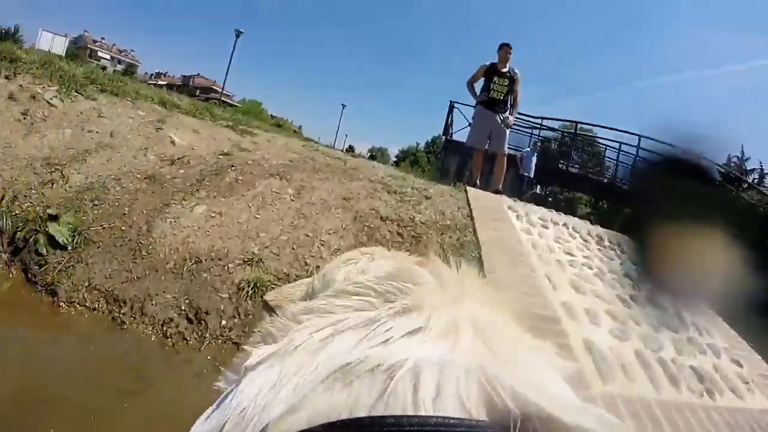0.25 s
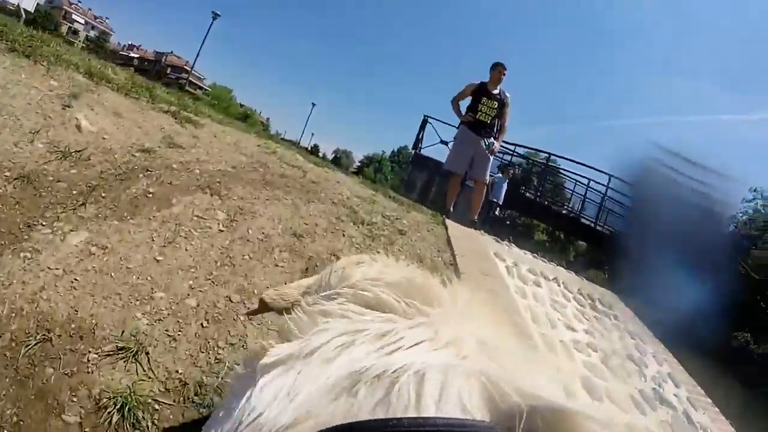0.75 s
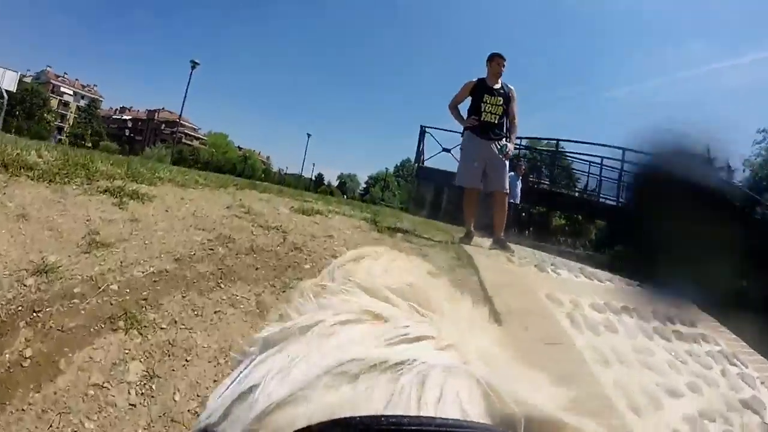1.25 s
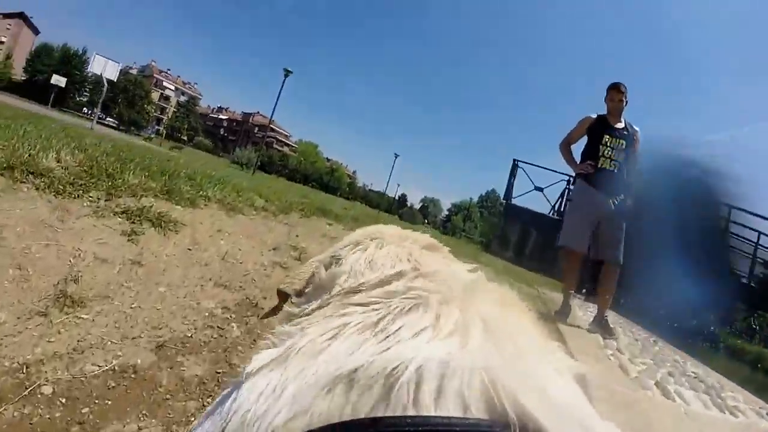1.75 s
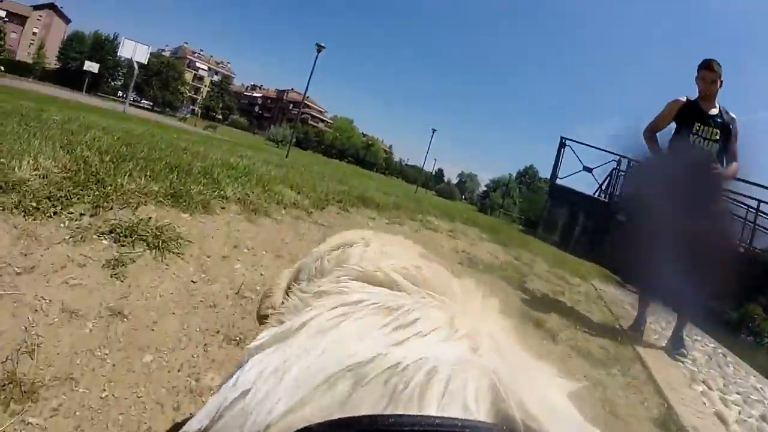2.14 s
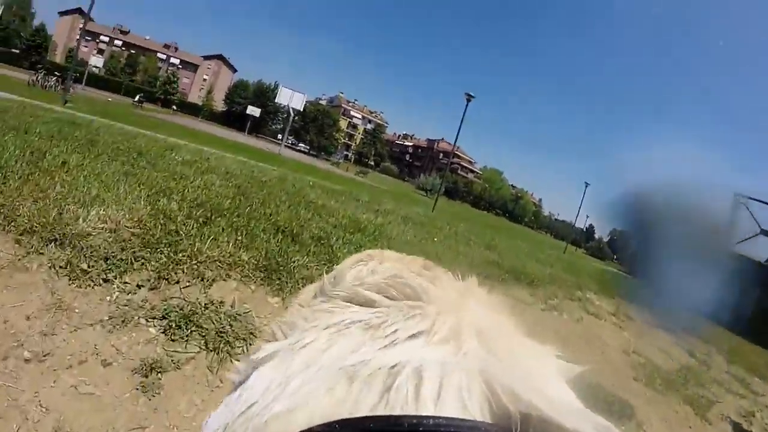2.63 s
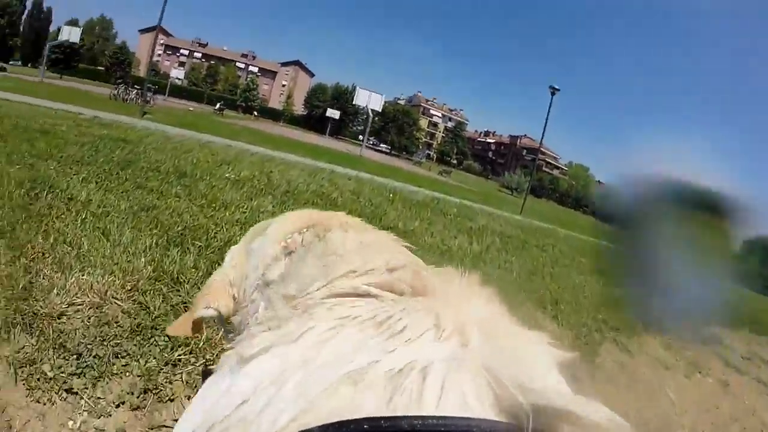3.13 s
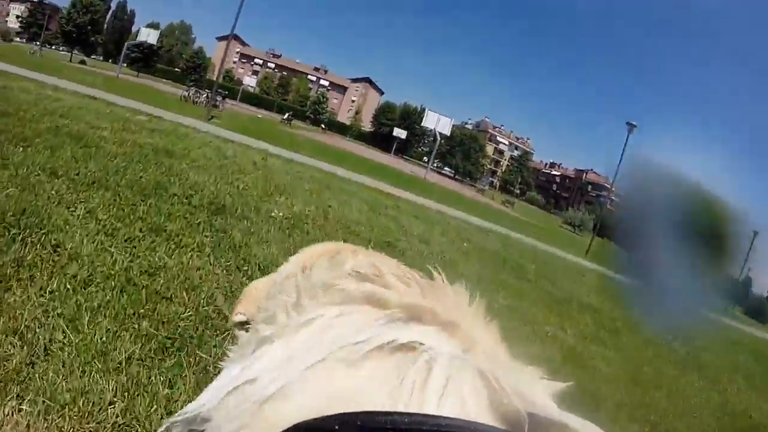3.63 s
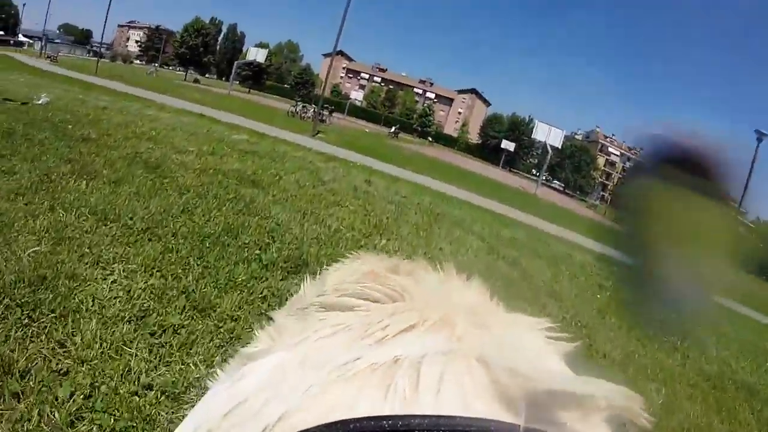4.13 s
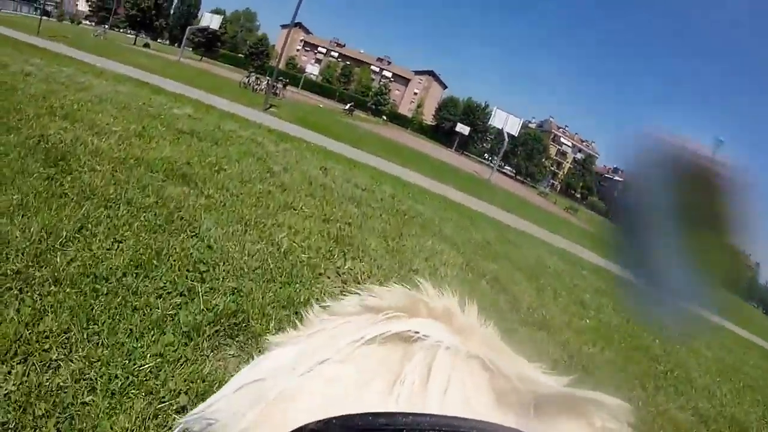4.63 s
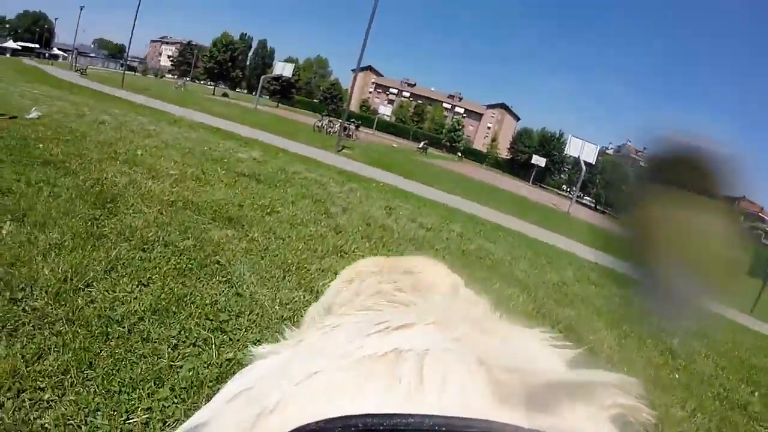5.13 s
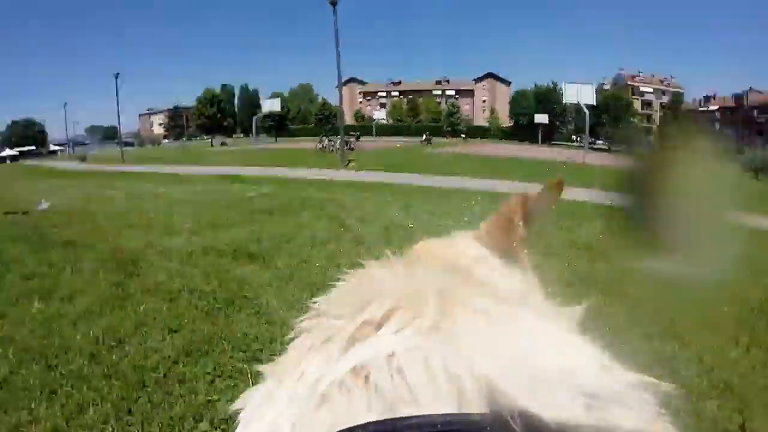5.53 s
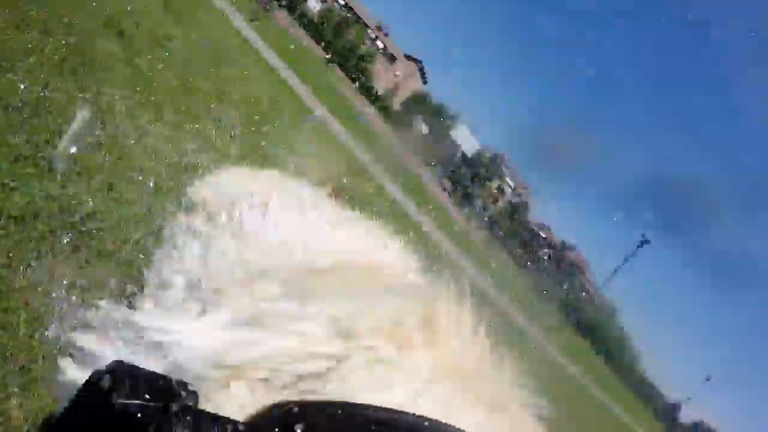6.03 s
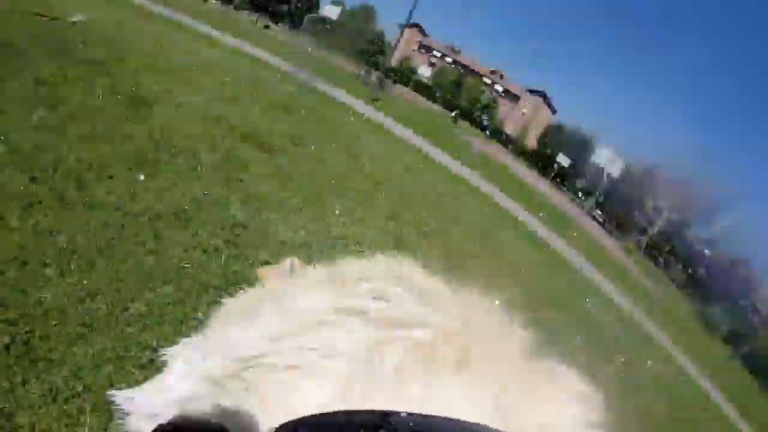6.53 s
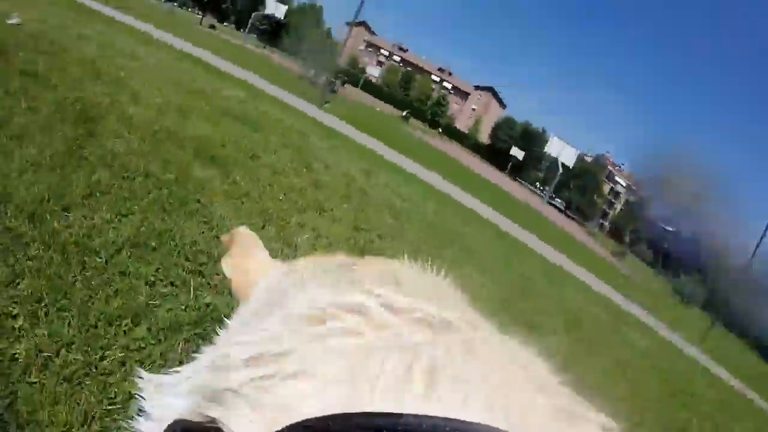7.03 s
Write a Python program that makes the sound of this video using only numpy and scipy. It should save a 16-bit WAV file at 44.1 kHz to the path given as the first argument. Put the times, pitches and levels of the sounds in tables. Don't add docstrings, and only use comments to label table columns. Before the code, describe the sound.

Outdoors, from a microphone sealed in plastic on a wet dog's back: deep lurching rumble with gurgling dribble and soft water slaps at first, thinning out. Three sharp bouncing plastic knocks follow, the last hardest. After a quieter stretch the dog shakes itself, with heavy low jolts, rough wet rubbing, flung drops and a rattling buckle.

```python
import sys
import numpy as np
from scipy import signal
from scipy.fft import rfft, irfft, next_fast_len
from scipy.io import wavfile
from scipy.ndimage import uniform_filter1d

SR = 44100
rng = np.random.default_rng(int(sys.argv[2]) if len(sys.argv) > 2 else 0)


def file_out(sig):
    cols = np.atleast_2d(sig).T
    lim = np.clip(cols, -1, 1)
    pcm = np.round(lim * 32767).astype(np.int16)
    wavfile.write(sys.argv[1], SR, pcm)


def field_ratio(decibels):
    return 10 ** (np.asarray(decibels, dtype=float) / 20)


N = 321048

# (time [s], level [dB])
AIR_LEVEL = [(0, -56), (1.2, -56), (4.2, -57), (4.27, -63), (4.29, -75), (4.4, -65.5), (4.5, -64),
             (5.0, -56.5), (5.35, -58), (5.6, -60), (6.4, -62), (7.28, -62.5)]
# (frequency [Hz], level per Hz [dB])
AIR_TONE = [(80, -22), (120, -7), (200, -7.5), (320, -10.5), (500, -13.5), (900, -17), (1600, -20.5),
            (2200, -21.5), (4000, -28.5), (7000, -35), (11500, -42), (12800, -45.5), (13600, -70)]
# (frequency [Hz], level per Hz [dB])
DEEP_TONE = [(4.7, -22.5), (8.0, 9), (33, 6), (51, -4), (90, -18), (120, -45), (200, -120)]
# (frequency [Hz], level per Hz [dB])
UPPER_TONE = [(45, -25), (65, 0), (90, -4), (130, -13), (175, -28), (260, -48)]
# (time [s], level [dB])
TREMBLE_LEVEL = [(0, -30.5), (1.5, -30), (2.55, -36.5), (2.68, -37), (2.85, -29), (4.2, -37.5),
                 (4.32, -51.5), (4.55, -30.5), (5.45, -25.5), (5.6, -13), (7.1, -16), (7.28, -19.5)]
# (time [s], deep rumble level [dB], length [s], upper rumble relative to deep [dB])
BACK_LURCHES = [(0.01, -17, 0.71, -36.5), (0.504, -13.5, 0.068, -14.5), (0.614, -34.5, 0.095, -6),
                (0.657, -28, 0.19, -0.5), (0.864, -10.5, 0.042, -14.5), (0.98, -16, 0.2, -17),
                (1.273, -12.5, 0.13, -18), (1.404, -19, 0.1, -21), (1.626, -11.5, 0.092, -28.5),
                (1.755, -21, 0.12, -20), (1.943, -14, 0.15, -17), (2.093, -17.5, 0.21, -34),
                (2.404, -18.5, 0.24, -13.5), (2.5, -18.5, 0.14, -25), (2.81, -16.5, 0.14, -17),
                (2.94, -22.5, 0.03, -5.5), (3.285, -18, 0.14, -17.5), (3.595, -8.5, 0.05, -35.5),
                (3.724, -17.5, 0.15, -27), (4.01, -19.5, 0.21, -16.5), (4.148, -20, 0.097, -26),
                (4.513, -27.5, 0.21, -15.5), (5.024, -16.5, 0.043, -27.5), (5.428, -15.5, 0.081, -28.5),
                (5.677, -9.5, 0.11, -18.5), (5.92, -16, 0.19, -2), (6.2, -19.5, 0.18, -4),
                (6.46, -13.5, 0.045, -7.5), (6.79, -18.5, 0.36, 0.5), (7.08, -7.5, 0.15, -8.5)]
# (time of upstroke [s], peak [dB], frequency [Hz])
BODY_JOLTS = [(1.753, -10, 27.6), (5.559, -4.5, 39.9), (5.674, -6, 34.9), (5.718, 1.5, 41.6),
              (5.797, -6.5, 40), (5.929, -1.5, 41.3), (6.117, 2.5, 41.5), (6.302, 1, 41.2),
              (6.481, -0.5, 37.7), (6.699, -4.5, 49.1), (6.827, -6.5, 61), (6.913, -8, 52),
              (6.959, -3, 64.5), (7.077, -1.5, 62.3), (7.156, -2.5, 45.6)]
# (time [s], level [dB])
DRIBBLE_LEVEL = [(0, -53), (.25, -51), (.42, -49), (.62, -46), (.8, -51.5), (.95, -52), (1.3, -65.5),
                 (1.6, -61)]
# (frequency [Hz], level per Hz [dB])
DRIBBLE_TONE = [(250, -13), (480, -9.5), (750, -4), (1000, -6), (1400, -6), (1780, 0), (2250, -5),
                (3100, -9), (4500, -13), (5400, -19.5), (6300, -18), (9000, -28.5), (12500, -34),
                (14000, -55)]
# (time [s], level [dB])
WATER_SURGES = [
    (0.004, -46),
    (.12, -49),
    (.32, -44),
    (0.521, -46.5),
    (0.69, -44),
    (.87, -50.5),
    (1.04, -58),
    (1.21, -48),
]
# (time [s], level [dB])
RUB_LEVEL = [
    [(5.35, -62.5), (5.6, -53), (5.9, -50.5), (6.5, -58), (6.75, -60), (7.28, -62.5)],
]
# (centre time [s], length [ms], bright level [dB], dull level [dB])
COAT_FLAPS = [(1.752, 36, -39, -74), (1.953, 21, -29.5, -25), (2.03, 66, -49.5, -70), (2.595, 60, -62, -48),
              (2.66, 60, -46, -69.5), (2.771, 78, -53.5, -64), (4.069, 110, -55, -65),
              (4.579, 62, -56.5, -46.5), (4.615, 11.5, -70, -49), (4.69, 77, -51.5, -71),
              (5.08, 72, -49.5, -49), (5.4, 30, -50, -55), (5.442, 60, -47.5, -48.5),
              (5.588, 16, -30.5, -24), (5.706, 79, -32, -24.5), (5.809, 86, -32, -29),
              (5.915, 46, -29, -28.5), (5.987, 84, -31.5, -33), (6.098, 40, -33, -30.5),
              (6.185, 98, -41.5, -36), (6.288, 42, -31.5, -29), (6.371, 86, -42, -37),
              (6.464, 42, -36.5, -32.5), (6.541, 81, -41, -36.5), (6.643, 78, -46, -40),
              (6.864, 40, -53, -41), (6.995, 14, -40, -34), (7.045, 30, -55, -47), (7.095, 20, -56, -47.5),
              (7.137, 59, -50, -37)]
# (frequency [Hz], level per Hz [dB])
MOUNT_TONE = [(120, 16), (250, 3), (700, -9.5), (1200, -31.5), (2000, -36)]
# (frequency [Hz], level per Hz [dB])
HOUSING_TONE = [(450, -24.5), (700, 2), (900, -5), (1180, 2), (1620, -4), (2350, 2), (3200, -7),
                (4000, -23), (4900, -31), (5600, -14.5), (6400, -35), (9000, -49.5), (14000, -62)]
# (frequency [Hz], level per Hz [dB])
SPRAY_TONE = [(2500, -28), (4200, 8.5), (6000, -1.5), (9000, -9.5), (13500, -24.5), (16000, -30.5)]
# (time [s], peak [dB], frequency [Hz], time to fall 60 dB [s])
RINGING_NOTES = [(2.3325, -31, 2153, 0.065), (2.333, -51, 5776, 0.04), (2.6232, -29.5, 690, .03),
                 (2.6272, -16.5, 690, 0.017), (2.6272, -14.5, 5570, .014), (2.6305, -25, 5800, .012),
                 (2.6278, -7, 3320, .013), (2.627, -30, 8900, .009), (2.6275, -22, 4480, .009),
                 (2.6275, -18, 1222, .03), (2.6278, -10, 2430, 0.014), (2.636, -44.5, 2000, 0.069),
                 (2.6268, -38, 14900, .008), (4.2745, -16, 2000, .01), (4.279, -22, 790, .02),
                 (4.285, -44, 2250, .1), (4.2805, -14, 1563, .018), (1.952, -32, 2200, .03),
                 (4.05, -52, 950, .15), (4.075, -52, 1050, .1), (2.78, -52, 2000, .12),
                 (4.67, -52, 1700, .12), (4.675, -55, 2500, .12)]
# (frequency [Hz], level [dB], time to fall 60 dB [s])
HOUSING_RING = [(2200, -14, 0.072), (2440, -12, .025), (3250, -5, 0.008), (5650, -8, .012)]
# (time [s], peak [dB], pitch [Hz], treble relative [dB], thud relative [dB])
STRAP_SCUFFS = [
    (1.736, -39.5, 1900, -4.5, -9),
    (1.9463, -40.5, 690, -52.5, 13),
    (1.955, -26.5, 2040, -22, -16),
    (1.949, -30, 3000, -14, -10),
    (1.962, -34, 2600, -14, -10),
    (1.979, -42, 720, -24, -21),
    (4.612, -41, 377, -38, -3),
]
# (time [s], peak [dB], pitch [Hz], treble relative [dB], thud relative [dB])
FIRST_BLOW = [
    (2.3293, -38, 890, -20, 13.5),
    (2.331, -8.5, 2170, -17.5, -12.5),
    (2.3331, -17, 3000, -23, -20),
    (2.335, -25, 2000, -35.5, -15),
]
# (time [s], peak [dB], pitch [Hz], treble relative [dB], thud relative [dB])
SECOND_BLOW = [(2.6183, -44, 2600, -7.5, -10), (2.6235, -27, 2500, -43, 5), (2.627, -23, 1220, -20, 1),
               (2.628, -4.5, 2460, -24, -23), (2.6285, -30, 4500, -6, -20), (2.629, -8.5, 2530, -30, -15),
               (2.6313, -14, 1220, -11.5, -3.5), (2.633, -25, 2700, -30.5, -18.5),
               (2.6374, -29.5, 2520, -9, 0), (2.641, -37, 2300, -16.5, -12),
               (2.654, -43.5, 2300, -21.5, -13), (2.667, -36.5, 2300, -20, -1.5),
               (2.690, -38, 2370, -27.5, -17)]
# (time [s], peak [dB], pitch [Hz], treble relative [dB], thud relative [dB])
THIRD_BLOW = [
    (4.2735, -8, 3030, -19, -8.5),
    (4.276, 0.5, 2330, -23, -36),
    (4.2793, -2.5, 1510, -32, -13),
    (4.283, -12, 1510, -30, -22),
    (4.3277, -23, 2080, -15.5, -15),
    (4.3525, -35, 1540, -22, -11),
    (4.3505, -30, 2500, -22, -25),
    (4.372, -43, 1600, -27, -19),
    (4.3699, -41, 2600, -24, -20),
]
# (first [ms], second [ms], third [ms])
BLOW_SCRAPE_MS = (0.89, 0.68, 0.33)
# (time [s], peak [dB], pitch [Hz], treble
# relative [dB], scrape length [ms])
SOFT_SLAPS = [(0.037, -33, 1620, -32, 3.1), (0.311, -28.5, 1390, -30, 4.3), (0.493, -26, 800, -46, 1),
              (0.536, -29, 1150, -36, 10), (0.631, -35, 1650, -16, 12), (0.841, -33, 2600, -25, 2.6),
              (0.877, -32, 1690, -30, 3.8), (1.011, -36.5, 1360, -25, 8.4), (1.044, -34, 1900, -17, 14),
              (1.216, -31, 1950, -7, 2.9), (0.08, -37.5, 2770, -20, 3), (0.331, -32.5, 990, -35, 1.8),
              (0.686, -34, 1900, -15, 10), (0.733, -37, 1500, -20, 6), (0.924, -40.5, 1850, -25, 4),
              (1.173, -41.5, 1960, -25, 3), (1.36, -39, 1940, -27, 2.6), (4.039, -45, 940, -40, 35),
              (4.572, -44, 720, -39, 10.7), (4.664, -52, 2430, -39, 11)]
# (time [s], peak [dB], treble relative [dB], thud relative [dB])
BUCKLE_FACE_HITS = [(5.449, -38.5, -29, -18), (5.5774, -28.5, -1, 10), (5.5885, -11, -1, -33),
                    (5.5928, -3.5, -49, -38), (5.6914, -17.5, -4.5, -10), (5.699, -30.5, -12, -5),
                    (5.738, -37, 1.5, -13), (5.7518, -27, -26, -25), (5.802, -17.5, 0, -9),
                    (5.8141, -24, -3, -8), (5.8964, -28, -27.5, 7), (5.924, -25, -5, -9),
                    (5.954, -27.5, -35, -23), (5.9617, -28.5, -14, -14), (5.974, -36.5, -15, -14),
                    (5.9905, -20, -44, -10), (6.0616, -32, -24, -2), (6.0906, -20, -4, -7),
                    (6.158, -34.5, -4.5, -9), (6.183, -21, -36, -20), (6.2726, -23.5, -35, -19),
                    (6.3662, -23.5, -30, -2), (6.4352, -32.5, -42, -1), (6.4528, -20.5, -32, -8),
                    (6.541, -30.5, -29, -5), (6.6249, -26.5, -34, -2.5), (6.8628, -34.5, -32, 1.5),
                    (6.9944, -35, -26, -13), (7.119, -29.5, -34, -5), (7.143, -37, -6.5, -7)]
# (time [s], peak [dB], pitch [Hz], treble relative [dB], thud relative [dB])
BUCKLE_SIDE_HITS = [(5.5533, -24.5, 1250, -45, 8), (5.552, -34.5, 2390, -40, -20),
                    (5.7102, -10, 3000, -13.5, -22), (5.8236, -21, 3340, -4, -23),
                    (5.844, -31.5, 1510, -8, -19), (5.916, -44, 1140, -15, -10),
                    (6.005, -33, 3170, -3, -19), (6.0324, -41, 3000, 1, -11), (6.044, -45, 1290, -3.5, -21),
                    (6.112, -35, 2300, -5, 8), (6.1419, -39.5, 2620, -10, -11),
                    (6.2015, -30.5, 2320, -0.5, -24), (6.2516, -36, 2100, -27, 4),
                    (6.297, -28.5, 2400, -7.5, -17), (6.3773, -25.5, 1900, -7, -23),
                    (6.405, -44.5, 2000, -10, -3), (6.4751, -32, 1900, -10, 8.5), (6.549, -45, 3820, 2, -6),
                    (6.6477, -38, 2070, -12, -9), (6.7153, -47, 4200, -15, -13), (7.0727, -31, 400, -37, 1),
                    (7.2788, -29.5, 2400, -5.5, 1), (5.8047, -24, 2800, -6, -20), (5.8, -25, 2200, -7, -10),
                    (5.908, -31.5, 2400, -20, -3), (7.199, -39, 2320, -1, -25)]
# (time [s], peak [dB], pitch [Hz])
SMALL_TICKS = [(0.105, -40, 6800), (0.152, -39, 5700), (0.554, -37, 4500), (0.776, -39, 8900),
               (1.12, -39.5, 7100), (4.588, -48.5, 1890), (4.707, -45.5, 1680), (5.4047, -44.5, 3020),
               (5.6452, -47, 3000), (5.839, -46, 8000), (5.866, -49, 6000), (5.919, -38, 5600),
               (5.928, -31, 5400), (6.04, -41, 4000), (6.0662, -43, 4000), (6.0855, -30.5, 2600),
               (6.126, -35, 4000), (6.2208, -45, 4200), (6.3105, -44, 3020), (6.3396, -51, 3000),
               (6.3575, -42, 2000), (6.383, -40, 5630), (6.4269, -46, 4000), (6.467, -41, 3500),
               (6.478, -40, 3500), (6.491, -45, 4000), (6.5112, -50, 2500), (6.529, -40, 2200),
               (6.5725, -45, 5600), (6.59, -53, 5040), (6.6107, -49, 6000), (6.6535, -37, 2500),
               (6.7581, -55.5, 5500), (6.795, -56, 3500), (6.825, -51, 3020), (7.013, -42.5, 2500),
               (7.138, -45, 2500), (7.1495, -42.5, 2500), (7.166, -50, 3000), (5.726, -40, 5000),
               (5.741, -40.5, 4000), (5.845, -40, 5600), (5.848, -40, 4500), (2.409, -48, 2000),
               (2.525, -47, 2000), (4.343, -52, 900), (6.4735, -42, 3500), (6.299, -38, 4000),
               (6.665, -46, 2200), (5.811, -38, 9000), (5.819, -34, 5600), (5.934, -45, 5600),
               (5.965, -39, 5000), (6.0345, -42.5, 4000), (6.014, -45, 5600), (7.234, -49, 3000)]


def evened(x):
    return x / np.sqrt(np.mean(x ** 2) + 1e-20)


def peaked(x):
    return x / np.max(abs(x))


def level(rows, fade=.02):
    rows, t = np.array(rows), np.arange(N) / SR
    inside = np.minimum(t - rows[0, 0] + fade, rows[-1, 0] + fade - t)
    return field_ratio(np.interp(t, rows[:, 0], rows[:, -1])) * np.clip(inside / fade, 0, 1)


def colour(x, points):
    hz, db = np.transpose(points)
    size = next_fast_len(len(x))
    pitch = np.log(np.fft.rfftfreq(size, 1 / SR) + 1)
    gain = field_ratio(np.interp(pitch, np.log(hz + 1), db, left=-90, right=-90))
    return evened(irfft(rfft(x, size) * gain, size)[:len(x)])


def bandpass(x, order, low_hz, high_hz):
    return signal.lfilter(*signal.butter(order, [low_hz, high_hz], "bandpass", fs=SR), x)


def resonance(x, hz, sharpness):
    return signal.lfilter(*signal.iirpeak(hz, sharpness, fs=SR), x)


def grit(per_s, spread_db):
    size = field_ratio(spread_db * np.minimum(rng.exponential(1, N), 4))
    return size * rng.standard_normal(N) * (rng.random(N) < per_s / SR)


def wander(hz):
    slow = signal.sosfilt(signal.butter(2, hz, fs=SR, output="sos"), rng.standard_normal(N))
    return np.clip(evened(slow), -2.5, 2.5)


def steadied(x, size):
    return x / (0.4 + np.sqrt(abs(uniform_filter1d(x ** 2, size=size))))


def swells(at_s, db, length_s):
    t = np.arange(0, N, 64)[:, None] / SR
    u = (t - at_s) / length_s
    lengths_away = np.where(u < 0, -u / 0.67, u)
    power = (field_ratio(db - 17.5 * lengths_away) ** 2).sum(axis=1)
    return np.interp(np.arange(N) / SR, t[:, 0], power)


def patchy(x, patch_db):
    z = signal.stft(x, nperseg=512)[2]
    blots = uniform_filter1d(rng.standard_normal(z.shape), size=5, axis=0)
    blots = uniform_filter1d(blots, size=7, axis=1)
    blotched = signal.istft(z * field_ratio(patch_db * evened(blots)), nperseg=512)[1]
    return evened(blotched[:N])


def add(mix, s, sound):
    part = mix[round(s * SR):][:len(sound)]
    part += sound[:len(part)]


def air():
    flickering = rng.standard_normal(N) * field_ratio(0.74 * wander(33))
    return field_ratio(3.5) * level(AIR_LEVEL) * colour(flickering, AIR_TONE)


def dribble():
    t, bubbles = np.arange(900) / SR, np.zeros(N)
    clumps = field_ratio(3.8 * wander(12))
    births = grit(60, 2.2)
    for hz, shift in zip(np.geomspace(950, 3300, num=20), rng.integers(0, N, size=20)):
        blip = np.sin(2 * np.pi * hz * t * (1 + 3.5 * t))
        blip *= np.exp(-t * hz / 10.0) * np.minimum(t / 0.00035, 1)
        clumped = np.roll(births, shift) * np.roll(clumps, -shift)
        bubbles += signal.oaconvolve(clumped, blip)[:N] * min(1, (1900 / hz) ** 2)
    fizz = colour(grit(6000, 3.0) * field_ratio(1.4 * wander(25)), DRIBBLE_TONE)
    at_s, surge_db = np.transpose(WATER_SURGES)
    flow = np.sqrt(level(DRIBBLE_LEVEL) ** 2 + swells(at_s, surge_db, 0.11))
    return flow * (field_ratio(-5.5) * evened(bubbles) + field_ratio(0.5) * patchy(fizz, patch_db=3.5))


def rumble():
    deep = steadied(colour(rng.standard_normal(N), DEEP_TONE), size=4000)
    upper = colour(rng.standard_normal(N) * field_ratio(3.5 * wander(25)), UPPER_TONE)
    upper = steadied(upper, size=3000)
    at_s, deep_db, length_s, upper_db = np.transpose(BACK_LURCHES)
    tremble = level(TREMBLE_LEVEL)
    deep_power = tremble ** 2 + swells(at_s, deep_db, length_s)
    upper_power = (field_ratio(-13) * tremble) ** 2 + swells(at_s, deep_db + upper_db, length_s)
    out = field_ratio(2.5) * deep * np.sqrt(deep_power) + field_ratio(-2.5) * upper * np.sqrt(upper_power)
    t = np.arange(-2205, 2205) / SR
    for s, db, hz in BODY_JOLTS:
        u = 2 * np.pi * hz * t
        dip_then_crest = u * np.exp(-u ** 2 / np.where(u < 0, 3.5, 6.0))
        add(out, s + t[0], field_ratio(db) * peaked(dip_then_crest))
    return 1.1 * np.tanh(out / 1.1)


def rub():
    bright, dull = np.zeros(N), np.zeros(N)
    for s, ms, bright_db, dull_db in COAT_FLAPS:
        u = np.linspace(0, 1, round(ms * 1.28 * SR / 1000))
        swell = peaked(u ** 0.9 * (1 - u) ** 1.5)
        add(bright, s - 0.39 * len(u) / SR, field_ratio(bright_db - 7.0) * swell)
        add(dull, s - 0.37 * len(u) / SR, field_ratio(dull_db - 2.0) * swell)
    grains = grit(4000, 2.1) * field_ratio(4.0 * wander(80))
    drops = field_ratio(-20) * colour(grit(200, 4.5), SPRAY_TONE)
    through_housing = (bright + level(RUB_LEVEL[0])) * colour(grains, HOUSING_TONE)
    return through_housing + bright * drops + dull * colour(grains, MOUNT_TONE)


def notes():
    out, t = np.zeros(N), np.arange(4000) / SR
    for s, db, hz, t60 in RINGING_NOTES:
        rise = 1 - np.exp(-t * 1000 / 0.6)
        add(out, s, field_ratio(db - 60 * t / t60) * rise * np.sin(2 * np.pi * hz * t))
    return out


def knock(db, hz, treble_db, thud_db, ms, ring_db, noise):
    t = np.arange(noise.shape[1]) / SR
    fall = np.exp(-t * 1000 / np.clip(ms, .1, 30)) * np.minimum(t * 1000 / np.clip(ms, .1, 1.5), 1)
    first_contact = np.exp(-(t * 1000 / 0.036 - 2) ** 2)
    drive = noise[0] * fall + first_contact
    spot_ring = np.sin(2 * np.pi * hz * t) * t * np.exp(-(1.26 - 0.0093 * db) * hz * t)
    spot = signal.fftconvolve(drive, spot_ring)[:len(t)]
    modes = sum(field_ratio(d - 60 * t / t60) * np.sin(2 * np.pi * f * t) for f, d, t60 in HOUSING_RING)
    after = signal.fftconvolve(drive, modes)[:len(t)]
    top_hz = np.clip(13300 + 279 * (db + treble_db + 20), 6500, 15800)
    tick = bandpass(signal.lfilter([1], [1, -.35], noise[1] * fall ** 1.8), 2, 3700, top_hz)
    cavity = 3.5 * resonance(tick, 5650, 10) + 1.2 * resonance(tick, 9000, 8)
    tick = tick + cavity + 0.5 * resonance(tick, 14900, 12)
    thud = bandpass(uniform_filter1d(drive, size=9, origin=4), 2, 200, 950)
    buzz = bandpass(noise[1] * fall ** .5, 3, 1000, 3600)
    after_gain = field_ratio(ring_db + 0.097 * db)
    parts = peaked(spot) + after_gain * peaked(after) + field_ratio(-12.5) * peaked(buzz)
    return field_ratio(db) * (parts + field_ratio(treble_db + 0.5) * peaked(tick) + field_ratio(thud_db - 1.5) * peaked(thud))


def buckle():
    rows = [(*row, 5.3) for row in STRAP_SCUFFS]
    start_s = BUCKLE_FACE_HITS[0][0]
    for s, db, *rest in BUCKLE_FACE_HITS:
        face_hz = 2370 - 120 * (s - start_s)
        rows.append((s, db, face_hz, *rest, 1.3))
    rows += [(*row, 1.3) for row in BUCKLE_SIDE_HITS]
    rows = [(*row, -22) for row in rows]
    rows += [(s, db, hz, treble_db, -14, ms, -30) for s, db, hz, treble_db, ms in SOFT_SLAPS]
    blows = (FIRST_BLOW, SECOND_BLOW, THIRD_BLOW)
    for blow, ms, ring_db in zip(blows, BLOW_SCRAPE_MS, (-22, -18, -34)):
        rows += [(*row, ms, ring_db) for row in blow]
    rows += [(*row, -11, -17.5, 0.87, -30) for row in SMALL_TICKS]
    out = np.zeros(N)
    for row, noise in zip(rows, rng.standard_normal((len(rows), 2, 3000))):
        add(out, row[0] + .0001, knock(*row[1:], noise))
    return out


def scene():
    return (air() + dribble() + rumble() + rub() + notes() + buckle())[None]


def band_limit(x):
    return signal.sosfilt(signal.butter(12, 16480, fs=SR, output="sos"), x)


def record(dry):
    clipped = np.clip(dry - dry.mean(), -1, 1)
    limited = signal.oaconvolve(clipped, signal.firwin(101, 15500, fs=SR)[None], "same")
    return band_limit(limited)


dry = scene()
out = record(dry)
file_out(out)
```